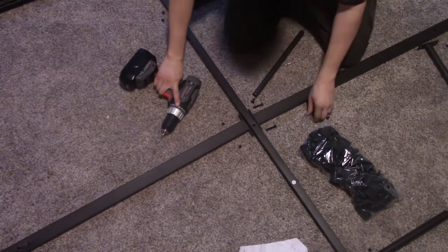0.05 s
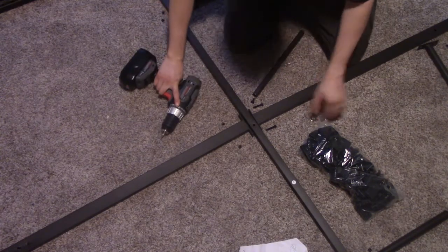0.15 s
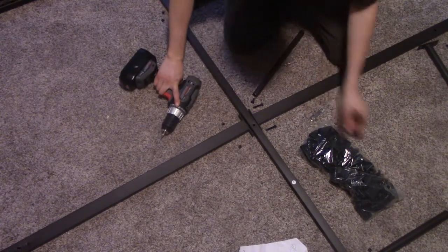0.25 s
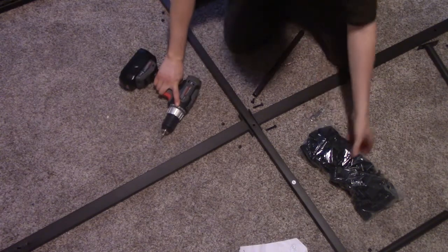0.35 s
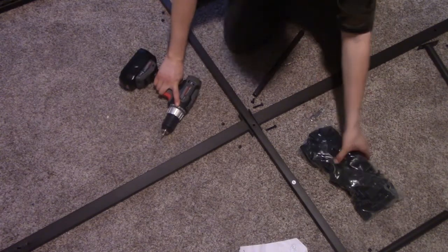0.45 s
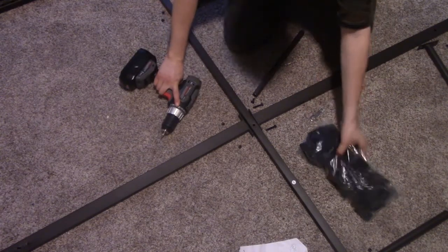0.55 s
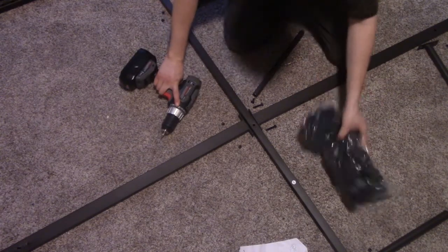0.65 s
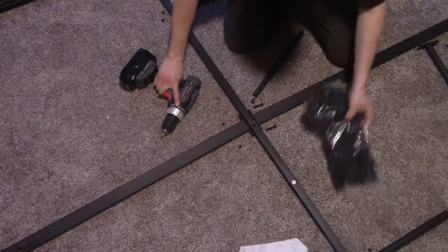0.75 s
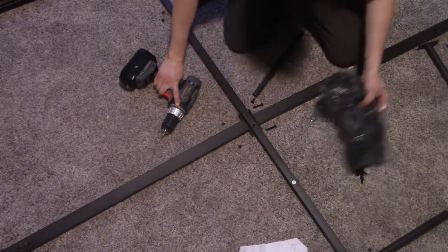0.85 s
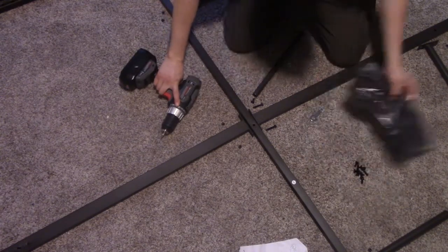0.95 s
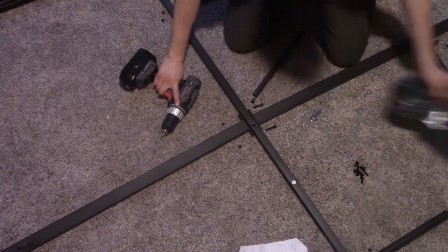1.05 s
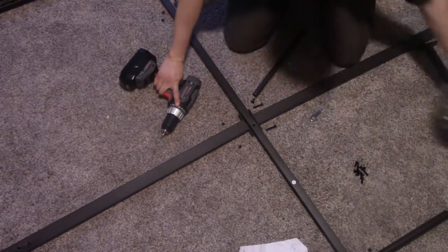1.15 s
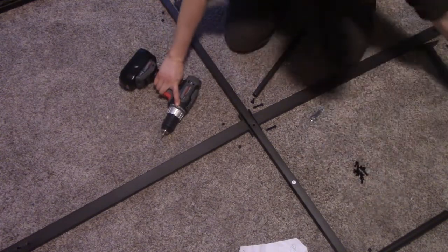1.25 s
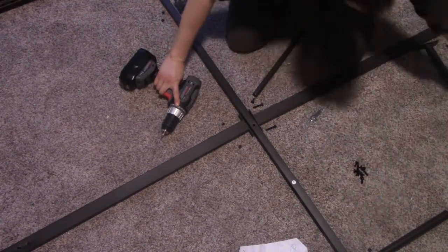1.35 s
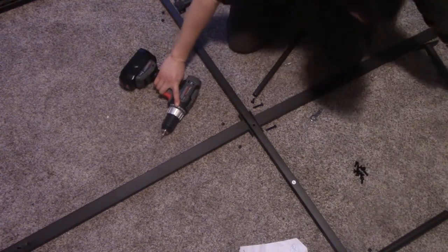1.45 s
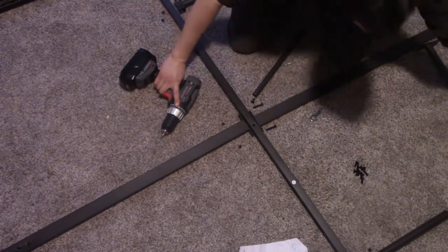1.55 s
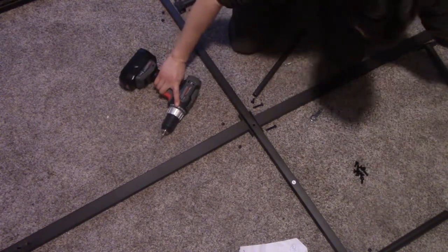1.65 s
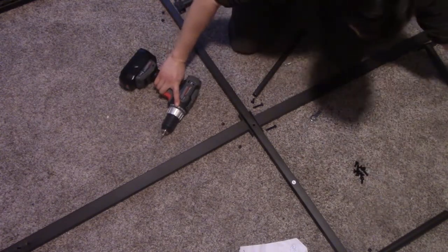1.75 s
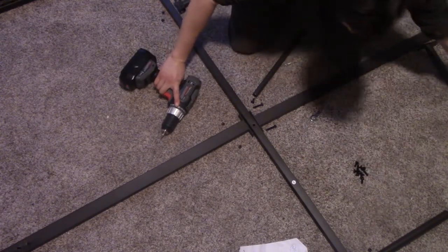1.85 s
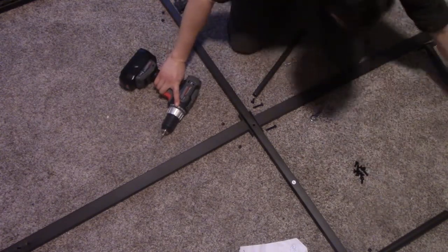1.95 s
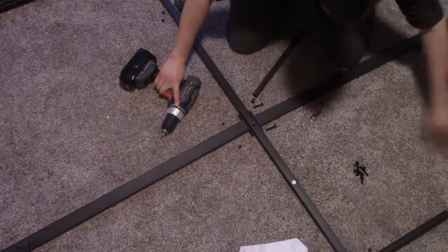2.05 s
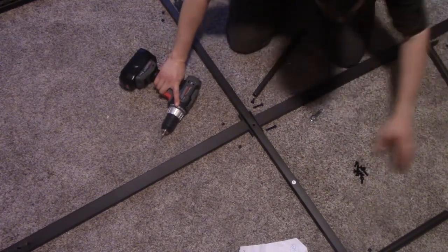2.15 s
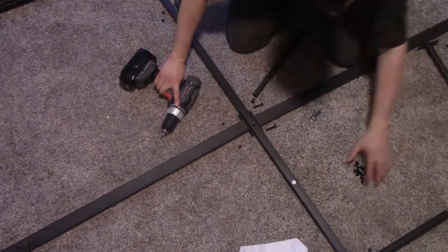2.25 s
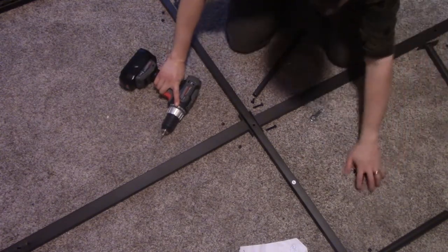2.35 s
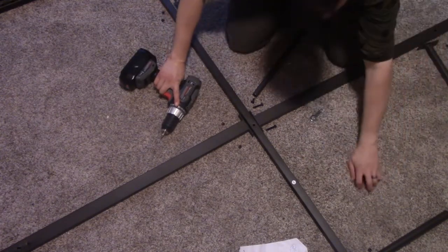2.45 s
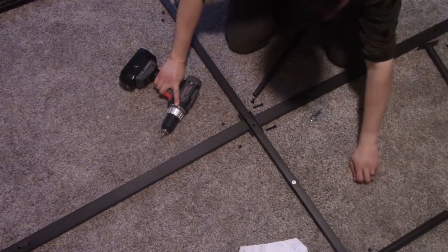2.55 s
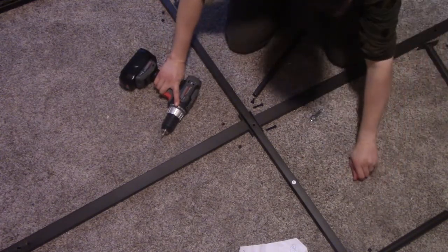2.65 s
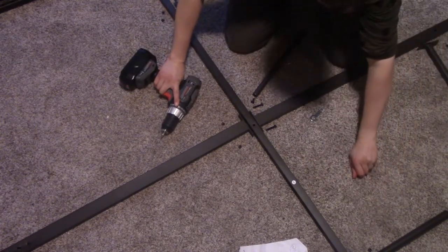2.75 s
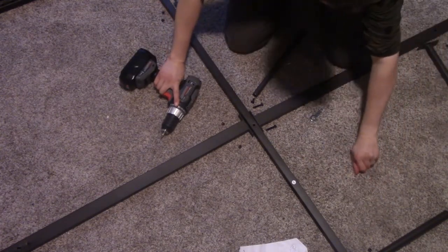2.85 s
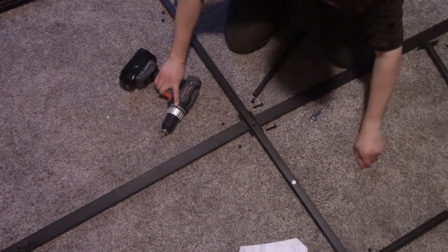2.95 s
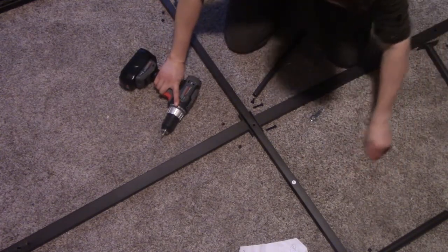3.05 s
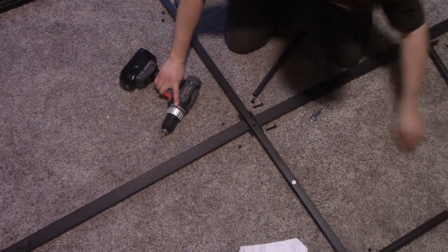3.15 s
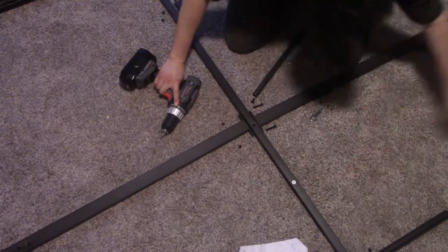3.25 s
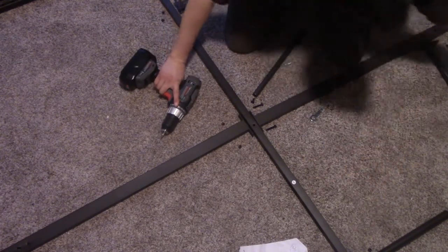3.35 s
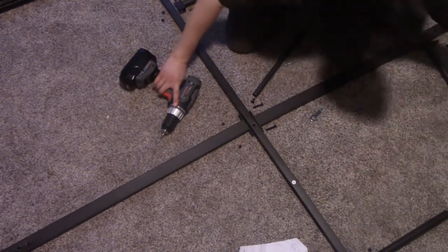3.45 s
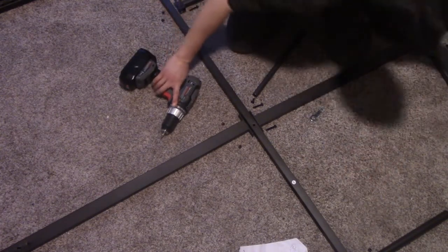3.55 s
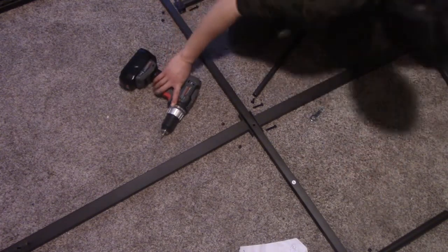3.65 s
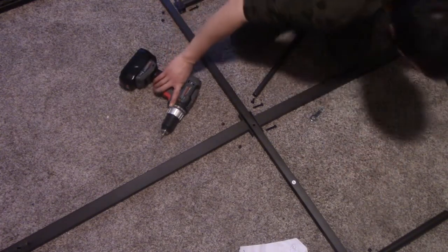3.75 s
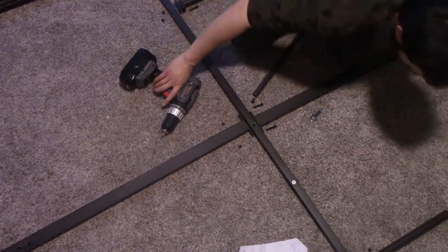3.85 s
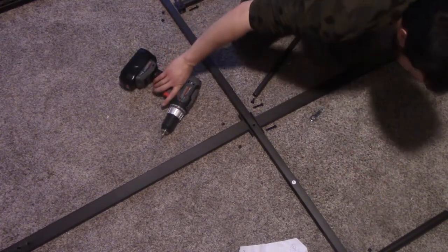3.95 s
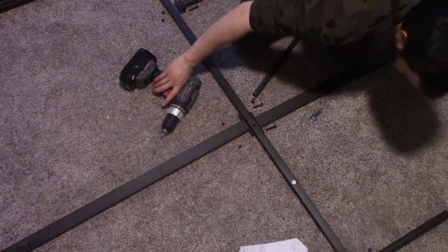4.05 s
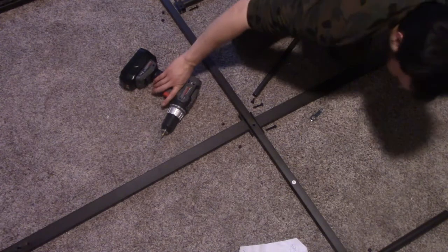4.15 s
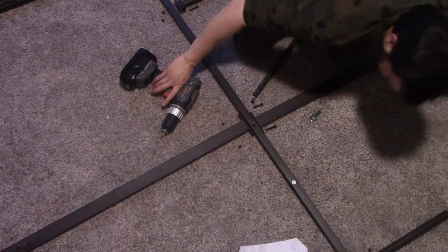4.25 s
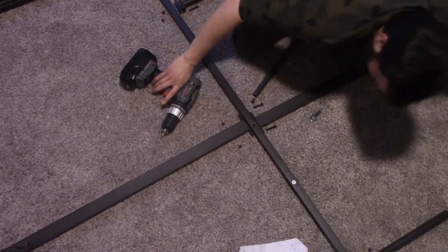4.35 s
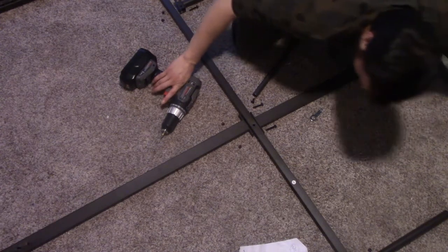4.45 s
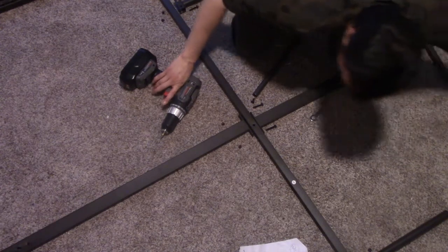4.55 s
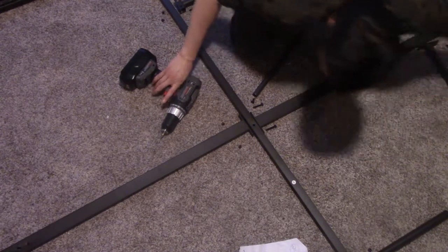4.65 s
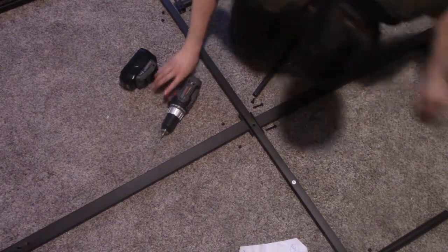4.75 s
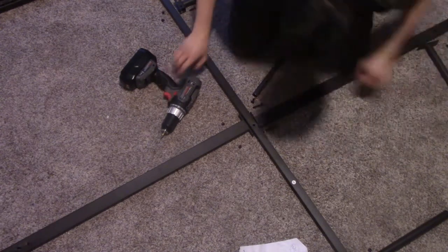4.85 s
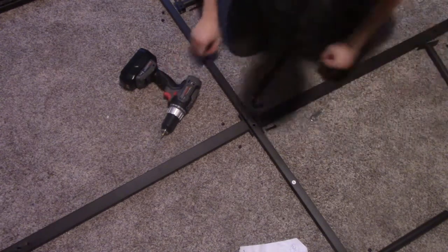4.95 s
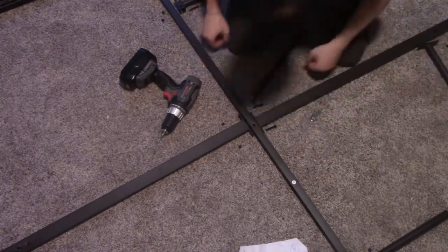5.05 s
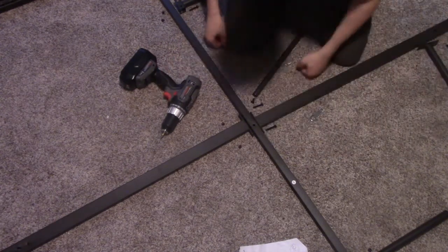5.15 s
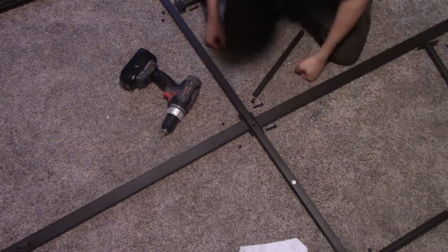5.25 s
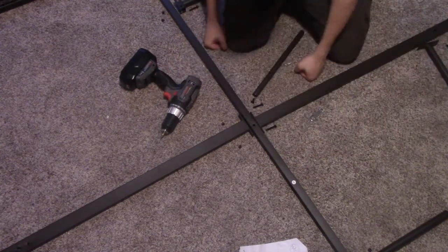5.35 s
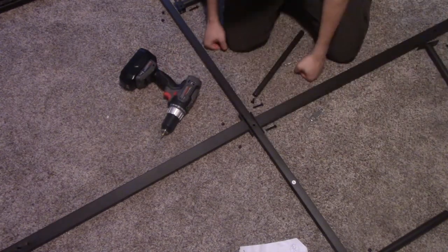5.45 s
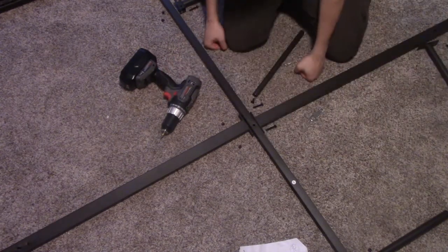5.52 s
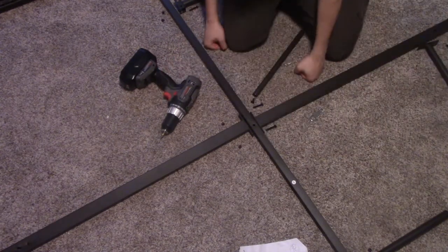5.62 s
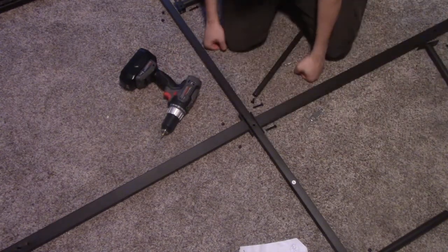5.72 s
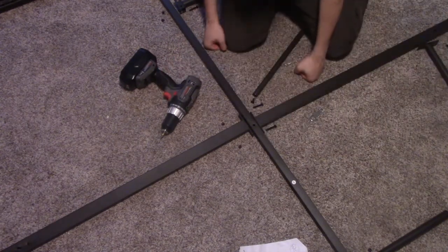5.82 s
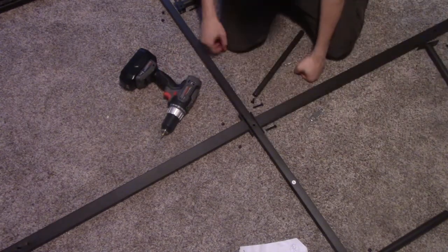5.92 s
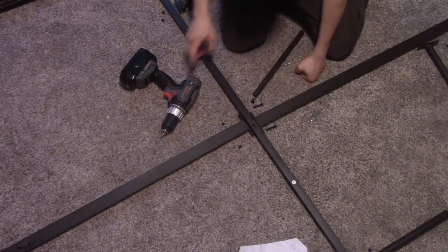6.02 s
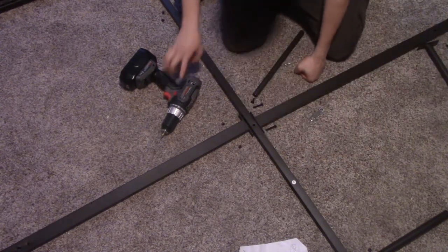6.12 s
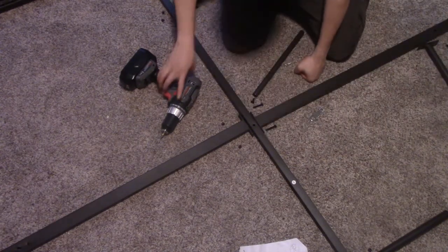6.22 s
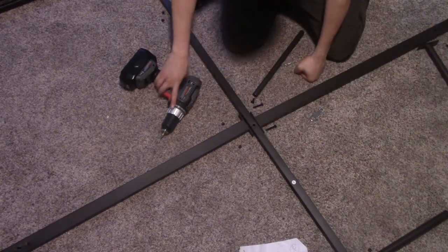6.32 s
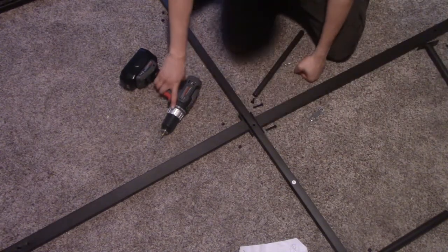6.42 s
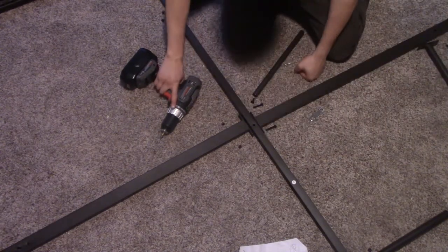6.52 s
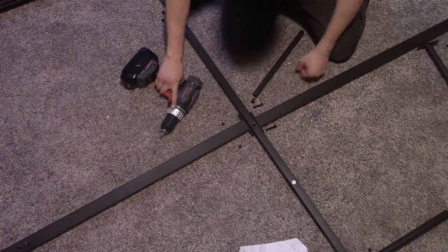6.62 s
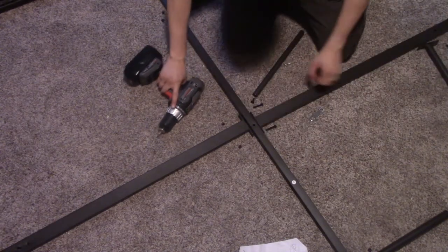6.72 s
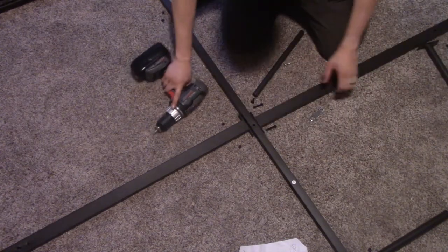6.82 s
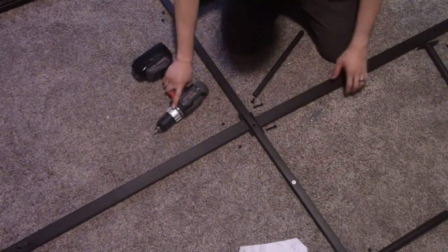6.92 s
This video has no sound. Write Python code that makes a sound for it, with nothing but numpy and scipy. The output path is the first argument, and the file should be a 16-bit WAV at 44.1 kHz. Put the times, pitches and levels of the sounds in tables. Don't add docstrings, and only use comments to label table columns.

```python
import sys
import numpy as np
from scipy import signal
from scipy.fft import rfft, irfft, next_fast_len
from scipy.io import wavfile
from scipy.ndimage import uniform_filter1d

SR = 44100
rng = np.random.default_rng(int(sys.argv[2]) if len(sys.argv) > 2 else 0)


def undo_db(level):
    steps = np.asarray(level, float) / 20
    return 10 ** steps


def wav_record(signal):
    frames = np.transpose(np.atleast_2d(signal))
    bounded = np.clip(frames, -1, 1)
    quanta = np.round(bounded * 32767).astype(np.int16)
    wavfile.write(sys.argv[1], SR, quanta)


N = 307818

# frequency in Hz, density in dB per Hz.
BAG_SPECTRUM = [(53, -57), (90, -27.5), (321, 1.5), (398, -1.5), (494, -1.5), (793, -3), (2590, 0.5),
                (5280, -14), (10500, -18.5), (11500, -27.5), (15500, -33)]
HEAP_SPECTRUM = [(53, -53.5), (90, -23), (282, -7.5), (314, -4), (381, -10.5), (697, -5), (810, -10),
                 (1030, -7.5), (1450, -11.5), (2280, -2), (7290, -19.5), (12200, -32.5), (15500, -47.5)]
CARPET_SPECTRUM = [(53, -55), (90, -7), (148, -3), (282, -1.5), (562, 1.5), (1300, -8.5), (2890, -16),
                   (4950, -29), (10500, -29), (15500, -51)]
POUR_SPECTRUM = [(53, -55), (90, -21), (307, -11), (350, -10), (424, -7.5), (864, -5), (942, -5.5),
                 (2280, 1.5), (5630, -12), (10300, -17.5), (15500, -35.5)]

# frequency in Hz, bandwidth in Hz, level in dB.
BAG_MODES = [(1180, 56.8, -5), (1890, 34, 1.5), (2640, 590, -2.5), (3164, 42, -1.5), (4000, 61, -8)]
HEAP_MODES = [(700, 60, -18), (2450, 940, -4.5), (4600, 350, -15)]
POUR_MODES = [(1940, 120, -1), (2230, 99, -17), (2930, 260, 8), (4730, 56, -31.5), (6400, 220, -41)]
SCREW_MODES = [(6180, 140, -38), (7400, 410, -34), (10400, 160, -33)]

# time in seconds, level in dB.
GRAB_EFFORT = [(0.33, -75), (0.408, -50), (0.418, -29.5), (0.49, -29), (0.53, -31), (0.558, -24),
               (0.59, -30.5), (0.776, -36), (0.82, -41.5)]
LIFT_EFFORT = [(0.815, -43), (0.836, -35), (0.94, -55), (0.97, -42.5), (0.98, -46), (1.07, -61)]
CARRY_EFFORT = [(1.06, -59.5), (1.104, -49), (1.264, -40), (1.338, -39.5), (1.388, -34), (1.51, -42)]
DROP_EFFORT = [(1.512, -41), (1.527, -20), (1.54, -13), (1.576, -14), (1.63, -23.5), (1.72, -37.5)]
RAKE_EFFORT = [(2.26, -68), (2.38, -52.5), (2.42, -54), (2.478, -46.5), (2.628, -51.5), (2.715, -67)]
CLENCH_EFFORT = [(2.71, -59), (2.758, -51), (2.924, -49), (3.018, -54), (3.162, -94)]
TIP_EFFORT = [(3.964, -49), (3.992, -24.5), (4.023, -21), (4.2, -33.5), (4.269, -41), (4.405, -37),
              (4.465, -48.5), (4.507, -49), (4.66, -77)]

# peak in seconds, level in dB, rise in seconds, fall in seconds.
REACH_RUBS = [
    (3.35, -78, 0.086, 0.091),
    (3.62, -62.5, 0.32, .1),
    (3.71, -52.5, 0.075, 0.21),
    (3.832, -45, 0.022, 0.3),
]
SHUFFLE_RUBS = [
    (4.71, -59.5, .06, .15),
    (4.9, -63, .08, .1),
    (5.02, -59, .08, 0.11),
    (5.1, -56, .15, 0.12),
    (5.2, -59.5, 0.11, .6),
    (5.63, -56.5, 0.28, 0.14),
    (6.24, -53, 0.016, 0.12),
    (6.43, -61.5, .4, .15),
    (6.7, -55.5, 0.41, .3),
    (6.8, -59, 0.28, 0.35),
]
RUB_SPAN_DB, IDLE_DB = 21.5, -72

# level in dB at full effort, share of the effort's swing (ratio).
BAG_BALANCE = [(-8.5, .8), (-5.5, 1.0)]
SWUNG_BALANCE = [(-9, 0.76), (-10, 0.51)]
HEAP_BALANCE = [(-10.5, .9), (-8.5, 1)]
RAKED_BALANCE = [(1, 1.0), (-11.5, 0.98)]
FIST_BALANCE = [(1, 0.94), (-12, 1.0)]
REACH_BALANCE = [(-6, 0.65), (-10, 0.74)]
POUR_BALANCE = [(-10, 0.68), (-9.5, 0.96)]
CLOTH_BALANCE = [(-5, 1), (-9.5, 0.75)]
CLUMP_DB, CLUMP_S = .7, .015

# start in seconds, peak in dB, ring in Hz.
HARD_BLOWS = [
    (1.5192, -3.5, 2640),
    (1.5424, 7.5, 2340),
    (1.5594, 0.5, 2230),
    (1.575, 4, 2753),
    (1.5874, -10.5, 2255),
    (1.5994, -27.5, 2530),
    (1.616, -5, 2540),
    (1.6467, -25, 2260),
    (3.9898, -6, 2210),
    (3.9958, -30, 2180),
]

# level in dB, frequency in Hz, decay time t60 in seconds.
RAIL_HUM = (-37, 672, .6)
RAIL_START_S = 1.56

# start in seconds, peak in dB, high ring in Hz, lower knock in relative dB, lower knock in Hz.
BAG_TICKS_HEARD = [(0.38, -50, 5960, 5, 2280), (0.419, -21, 9300, 0, 2720), (0.6714, -32, 7200, -1, 2550),
                   (0.691, -28.5, 4570, 16, 2790), (0.7569, -30, 6150, 14, 2680),
                   (0.836, -26.5, 10400, -11, 2800), (0.8769, -29.5, 10400, -4.5, 1470),
                   (0.946, -35, 10400, -7, 1940), (0.965, -25.5, 9100, 0.5, 2780),
                   (1.076, -43, 10400, 0, 1510), (1.1207, -39, 9730, -1.5, 1742),
                   (1.134, -34.5, 5670, 5, 1290), (1.16, -43, 4480, 9.5, 1286),
                   (1.2128, -32.5, 5270, 6.5, 1782), (1.256, -29.5, 8780, 9.5, 1327),
                   (1.3433, -30, 7520, 1.5, 1373), (1.3797, -36.5, 4827, 12.5, 1960)]
CHATTERS = [(0.8267, -20.5, 5830, -15, 2760), (2.471, -34, 8200, -6, 2000), (2.744, -32, 8400, -10, 2800),
            (2.7473, -27.5, 10000, -2.5, 2780), (2.7522, -35.5, 7700, 2, 2980),
            (2.886, -28, 7200, -18, 3480), (3.445, -34.5, 10200, -29, 5800),
            (3.8349, -31.5, 8800, 9.5, 2750), (3.8388, -46, 5000, 15, 2100), (4.50, -40, 5960, 10, 2500),
            (4.529, -47, 6030, 12, 2510), (6.245, -46, 4910, 9, 2054)]

# start in seconds, peak in dB, high ring in Hz.
FINGER_TICKS = [(2.4433, -46.5, 6150), (2.4684, -50, 8200), (2.4804, -33, 10400), (2.492, -42, 10400),
                (2.5105, -34, 10400), (2.5264, -45, 10500), (2.55, -32, 9900), (2.5688, -32, 11300),
                (2.58, -31, 10700), (2.5925, -51, 6050), (2.6018, -39, 11000), (2.6216, -36, 10400),
                (2.63, -37, 9400), (2.639, -35, 10400), (2.804, -36, 7060), (2.827, -35.5, 7250),
                (3.68, -40, 10400), (3.7803, -44, 6220), (3.8504, -38, 5750)]
LOOSE_KNOCK_DB, LOOSE_KNOCK_HZ = -11, 1350

# start in seconds, peak in dB, high ring in Hz, lower knock in relative dB.
SCREW_LANDINGS = [
    (3.713, -34, 6200, -4),
    (3.97, -20.5, 7500, 0),
    (3.9802, -22.5, 6140, 10),
    (4.07, -28, 5260, 3.5),
    (4.6985, -39, 9500, -9),
    (6.2377, -37, 4200, 2),
]
# start in seconds, peak in dB, high ring in Hz, lower knock in relative dB.
HEAVIEST_LANDING = (3.9964, -11, 4450, 2)
LANDING_HZ = 2230
TICK_S, CLINK_S, LANDING_S = .0007, .001, .00035
EDGE_SHARE = 0.16
DULL_HZ, AWAY_S = 11500, 3.2

# start in seconds, peak in dB, decay t60 in seconds.
STEEL_PINGS = [(0.835, -29, 0.19), (.851, -34.5, 0.14), (.899, -40, 0.15), (2.402, -58, 0.15),
               (2.48, -52, .05), (2.510, -49, 0.079), (2.527, -46, .07), (2.568, -56, 0.11),
               (2.6, -41.5, 0.056), (2.77, -57, 0.13), (3.676, -47, .04), (4.01, -50, 0.037),
               (4.141, -39.5, 0.12), (4.200, -31.5, 0.25), (4.212, -34, 0.16), (4.251, -26.5, 0.18),
               (4.348, -55, 0.17)]
# frequency in Hz, level in dB.
STEEL_MODES = [(10423, 0), (10385, -10)]

# start in seconds, peak in dB, frequency in Hz.
FLOOR_THUMPS = [
    (2.375, -38, 327),
    (2.47, -34, 204),
    (2.601, -34, 157),
    (3.689, -36, 262),
    (5.089, -41, 228.6),
    (5.101, -42, 152),
    (5.105, -46.5, 331),
    (5.62, -48.5, 294),
    (6.254, -38.5, 220),
]

# frequency in Hz, decay time t60 in seconds.
ROOM_DECAY = [(100, .5), (300, 0.42), (700, 0.92), (1200, 1), (2400, .7), (3500, .75), (6000, 0.75),
              (11000, 0.36), (16000, 0.9)]
LATE_DB, LATE_STRETCH = -16.5, 1.6

# frequency in Hz, density in dB per Hz.
AIR_SPECTRUM = [(15, -50.5), (25, -22.5), (49, -14.5), (200, 1), (531, -0.5), (1290, -8.5), (1610, -7),
                (1740, -8), (4370, -17), (5730, -16.5), (9840, -25), (14400, -28.5), (16000, -40)]
AIR_DB = -59
# frequency in Hz, bandwidth in Hz, level in dB.
DUCT_BAND = (1590, 50, -71.5)

# frequency in Hz, level in dB.
SOURCE_WIDTH = [(60, -9.5), (150, -28), (380, -23.5), (950, -20.5), (2380, -20), (5980, -12), (15000, -13)]
HISS_WIDTH = [(60, -4.5), (180, -6.5), (550, -5.5), (1650, -7), (4970, -9), (15000, -17)]
PORT_LEAD = .15


def handling():
    near, far = np.zeros((2, N))
    bag_gestures = [(GRAB_EFFORT, BAG_BALANCE), (LIFT_EFFORT, SWUNG_BALANCE), (CARRY_EFFORT, SWUNG_BALANCE)]
    for curve, balance in bag_gestures:
        add(near, *contacts(along(curve), balance, BAG_SPECTRUM, BAG_MODES, -17.5, 7000, 2.41))
    add(far, *contacts(along(DROP_EFFORT), HEAP_BALANCE, HEAP_SPECTRUM, HEAP_MODES, -7.5, 9000, 2.2))
    for curve, balance in ((RAKE_EFFORT, RAKED_BALANCE), (CLENCH_EFFORT, FIST_BALANCE)):
        add(near, *contacts(along(curve), balance, CARPET_SPECTRUM, SCREW_MODES, -1.7, 3000, 3.0))
    add(far, *contacts(rubs(REACH_RUBS, 3.25, 3.97), REACH_BALANCE, POUR_SPECTRUM, [], 0, 8900, 4.0))
    add(far, *contacts(along(TIP_EFFORT), POUR_BALANCE, POUR_SPECTRUM, POUR_MODES, -27.5, 8000, 2.6))
    add(near, *contacts(rubs(SHUFFLE_RUBS, 4.62, 6.98), CLOTH_BALANCE, CARPET_SPECTRUM, [], 0, 7600, 1.8))
    return near, far


def contacts(gesture, balance, spectrum, modes, modes_db, per_s, spread_db):
    start, effort = gesture
    hit, size, sign = rng.random((len(effort), 3)).T
    strength = undo_db(-spread_db * np.log(np.maximum(size, .01)))
    hail = (hit < per_s / SR) * strength * np.sign(sign - .5)
    bunching = evened(uniform_filter1d(sign - .5, round(CLUMP_S * SR)))
    hail = hail * undo_db(CLUMP_DB * bunching)
    sound = evened(colour(hail, spectrum))
    for hz, width, db in modes:
        ringing = signal.oaconvolve(hail, ring(hz, 2.2 / max(width, 60)))[:len(hail)]
        sound = sound + undo_db(db + modes_db) * evened(ringing)
    thud = filtered(sound, 3, 900, "low")
    knock = filtered(sound, 3, [900, 4000], "band")
    crackle = filtered(sound, 3, 4000, "high")
    top = effort.max()
    layers = undo_db(effort) * evened(knock)
    for (db, share), layer in zip(balance, (thud, crackle)):
        layers = layers + undo_db(top + db + share * (effort - top)) * evened(layer)
    fade = signal.windows.tukey(len(hail), min(1, .012 * SR / len(hail)))
    return start, layers * fade


def along(curve):
    s, db = np.transpose(curve)
    return s[0], np.interp(np.arange(s[0], s[-1], 1 / SR), s, db)


def rubs(rows, start, end):
    t = np.arange(start, end, 1 / SR)
    power = undo_db(IDLE_DB) ** 2
    for s, db, rise, fall in rows:
        distance = np.maximum((s - t) / rise, (t - s) / fall)
        power = power + undo_db(db - RUB_SPAN_DB * distance) ** 2
    return start, 10 * np.log10(power)


def clacks():
    blows = np.zeros(N)
    for s, db, hz in HARD_BLOWS:
        add(blows, s, undo_db(db) * ring(hz, .027, .0015))
    return blows


def rail():
    db, hz, t60 = RAIL_HUM
    return undo_db(db) * ring(hz, t60, .01)


def knocks():
    hard = np.zeros(N)
    for s, *row in BAG_TICKS_HEARD:
        add(hard, s, tick(*row, TICK_S))
    for s, *row in FINGER_TICKS:
        add(hard, s, tick(*row, LOOSE_KNOCK_DB, LOOSE_KNOCK_HZ, TICK_S))
    for s, *row in list(SCREW_LANDINGS) + [HEAVIEST_LANDING]:
        add(hard, s, tick(*row, LANDING_HZ, LANDING_S))
    for s, *row in CHATTERS:
        add(hard, s, tick(*row, CLINK_S))
    dull = filtered(hard, 2, DULL_HZ, "low")
    return np.where(np.arange(N) < AWAY_S * SR, hard, dull)


def tick(db, hz, low_db, low_hz, length):
    t = np.arange(400) / SR
    touch = rng.standard_normal(len(t)) * np.exp(-t / np.clip(length, .0002, .002))
    high = np.zeros(900)
    add(high, 0, EDGE_SHARE * np.convolve(touch, [1, .8, -1, -.8]))
    add(high, 0, .5 * np.convolve(touch, ring(hz, .0013)))
    add(high, 0, .3 * np.convolve(touch, ring(hz * rng.uniform(.6, .8), .0015)))
    low = np.convolve(touch, ring(low_hz, .005))
    high = high / abs(high).max()
    add(high, 0, undo_db(low_db - 2.5) * low / abs(low).max())
    return undo_db(db - 2.5) * high


def pings():
    steel = np.zeros(N)
    for s, db, t60 in STEEL_PINGS:
        add(steel, s, sum(undo_db(db + rel_db) * ring(hz, t60, .0012) for hz, rel_db in STEEL_MODES))
    return steel


def add_thumps(near):
    for s, db, hz in FLOOR_THUMPS:
        add(near, s, undo_db(db) * ring(hz, .1, .006))


def room(x, lag=0.0016):
    taps = np.zeros((2, SR))
    at = np.arange(0, SR - 20, 20) + rng.integers(0, 20, (2, (SR - 1) // 20))
    np.put_along_axis(taps, at, rng.choice([-1., 1.], at.shape), 1)
    hz, t, z = signal.stft(taps, SR, nperseg=256)
    fall_db = -60 * t / read(ROOM_DECAY, hz)[:, None]
    decay = undo_db(fall_db) + undo_db(LATE_DB) * undo_db(fall_db / LATE_STRETCH)
    tail = signal.istft(z * decay, SR, nperseg=256)[1]
    tail *= 1 - np.exp(-np.arange(tail.shape[1]) / SR / lag)
    return signal.fftconvolve(x[None], tail / np.linalg.norm(tail[0]), axes=1)[:, :N]


def air():
    hiss = evened(colour(rng.standard_normal((2, N)), AIR_SPECTRUM))
    hz, width, db = DUCT_BAND
    duct = evened(signal.oaconvolve(rng.standard_normal(N), ring(hz, 1.53 / width))[:N])
    return undo_db(AIR_DB) * hiss[0] + undo_db(db) * duct, undo_db(AIR_DB) * colour(hiss[1], HISS_WIDTH)


def ring(hz, t60, rise=0.00007):
    t = np.arange(round(t60 * SR) + 8) / SR
    return np.sin(2 * np.pi * hz * t) * undo_db(-60 * t / t60) * (1 - np.exp(-t / rise))


def evened(x):
    return x / np.sqrt(np.mean(x ** 2) + 1e-20)


def read(points, hz):
    f, value = np.transpose(points)
    return np.interp(np.log(hz + 1), np.log(f + 1), value)


def colour(x, points):
    size = next_fast_len(x.shape[-1])
    gain = undo_db(read(points, np.fft.rfftfreq(size, 1 / SR)))
    return irfft(rfft(x, size) * gain, size)[..., :x.shape[-1]]


def filtered(x, order, hz, kind):
    return signal.sosfilt(signal.butter(order, hz, kind, fs=SR, output="sos"), x)


def add(mix, s, sound):
    part = mix[round(s * SR):][:len(sound)]
    part += sound[:len(part)]


def scene():
    near, far = handling()
    blows, hard, steel = clacks(), knocks(), pings()
    add(far, RAIL_START_S, rail())
    add_thumps(near)
    dry = undo_db(-1.5) * near + undo_db(-1.0) * far + hard + steel + undo_db(-5.0) * blows
    wet = room(undo_db(-8.0) * near + undo_db(-9.0) * far + undo_db(-5.5) * hard + undo_db(-15.5) * blows + undo_db(-4.5) * steel)
    hiss, hiss_side = air()
    heard = np.array([dry + wet[0], wet[1]])
    heard = filtered(heard, 3, 130, "high")
    mid = heard[0] + hiss
    side = colour(undo_db(3.5) * heard[1], SOURCE_WIDTH) + hiss_side
    side = side - 0.066 * mid + PORT_LEAD * np.gradient(heard[0])
    return np.array([mid + side, mid - side])


def roll_off(x):
    return signal.sosfilt(signal.butter(12, 16350, fs=SR, output="sos"), x)


def record(dry):
    bent = 1.3 * np.tanh(dry / 1.3)
    mix = signal.oaconvolve(bent, signal.firwin(255, 15750, fs=SR)[None], "same")
    return roll_off(mix)


dry = scene()
out = record(dry)
wav_record(out)
```